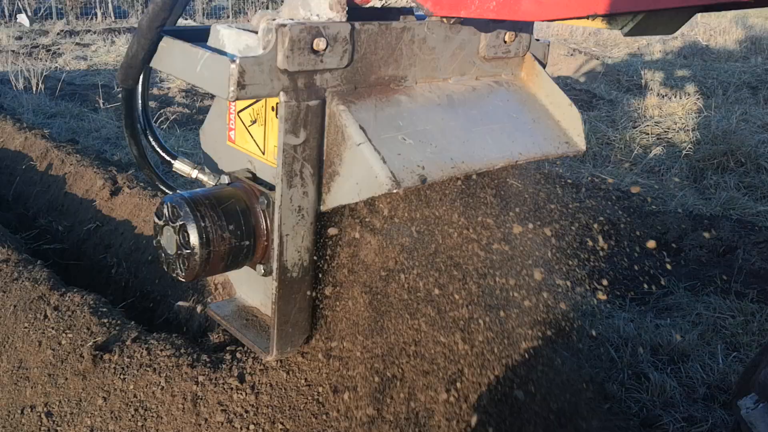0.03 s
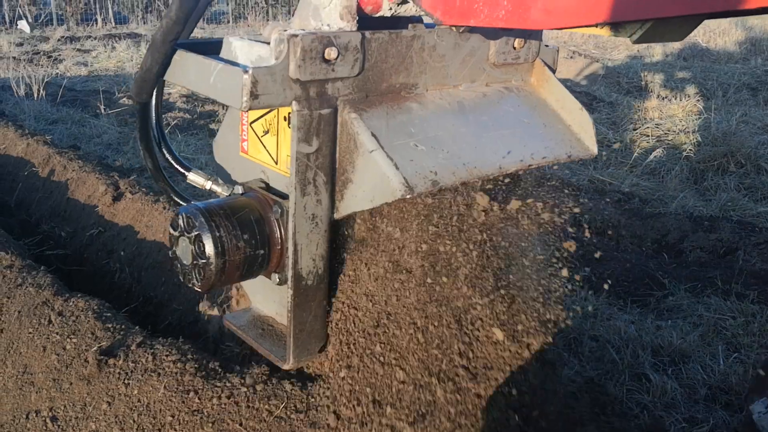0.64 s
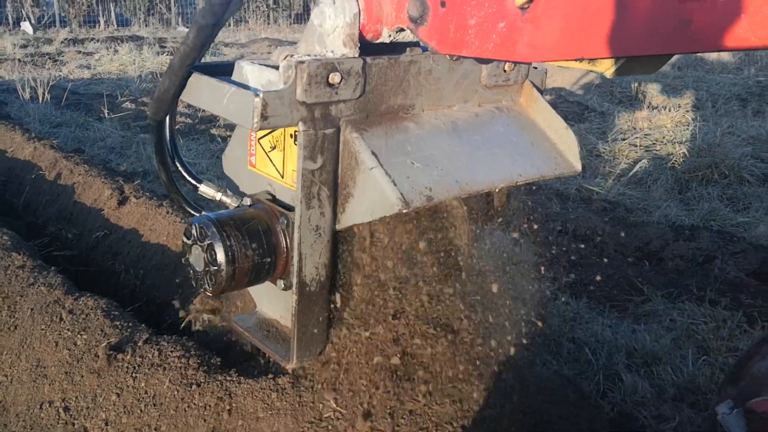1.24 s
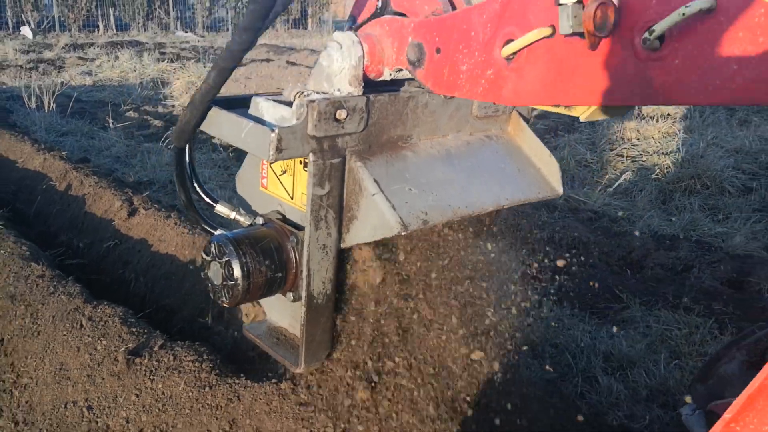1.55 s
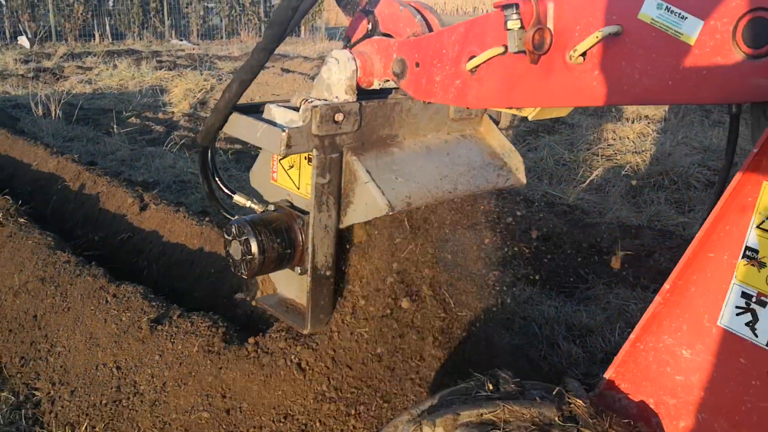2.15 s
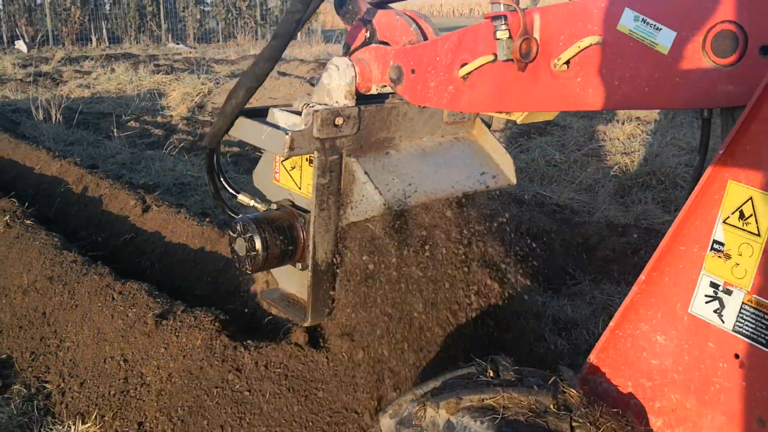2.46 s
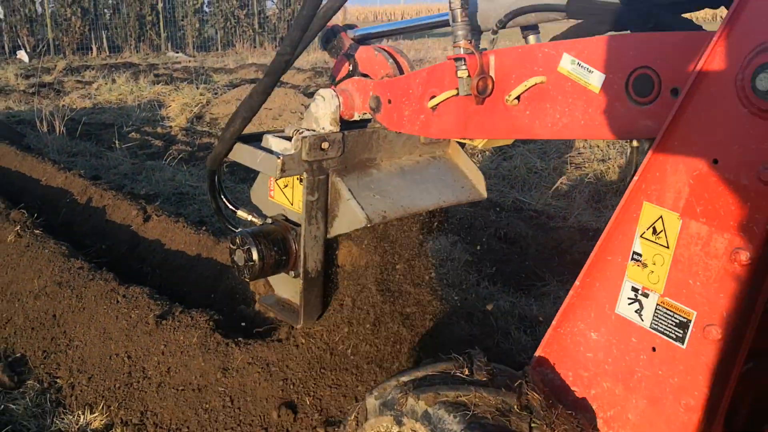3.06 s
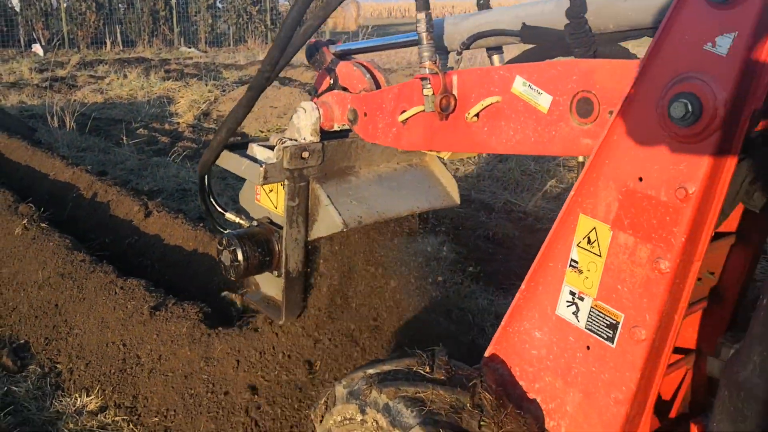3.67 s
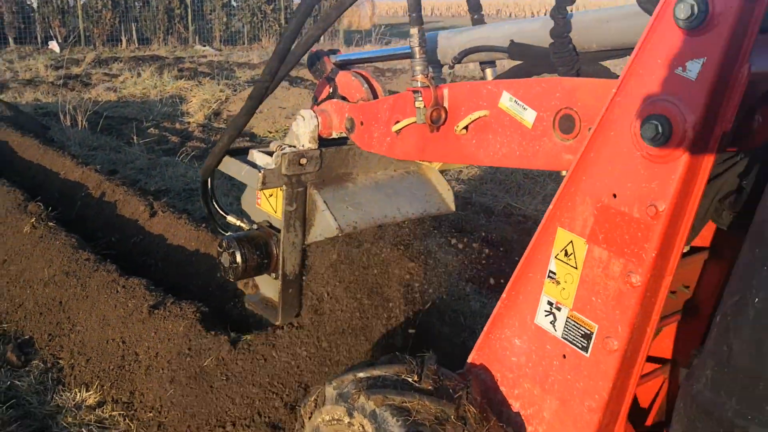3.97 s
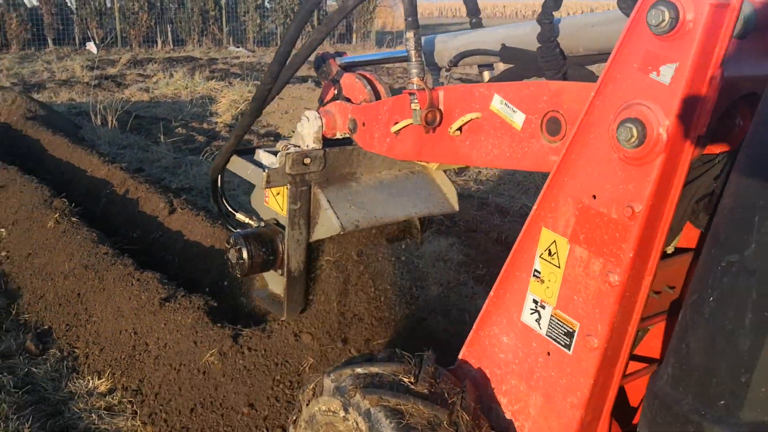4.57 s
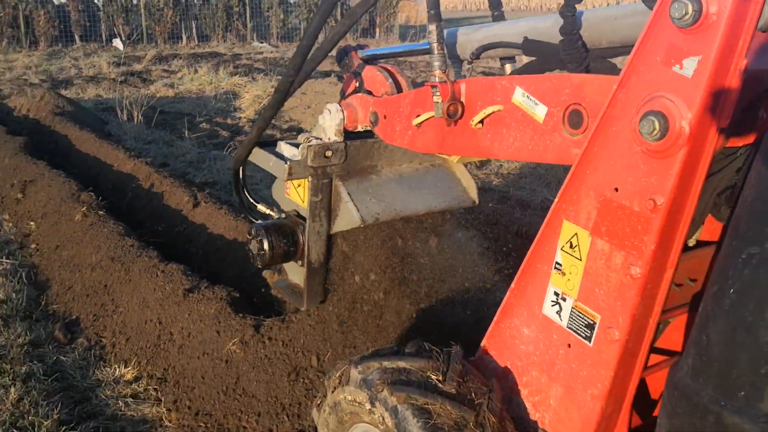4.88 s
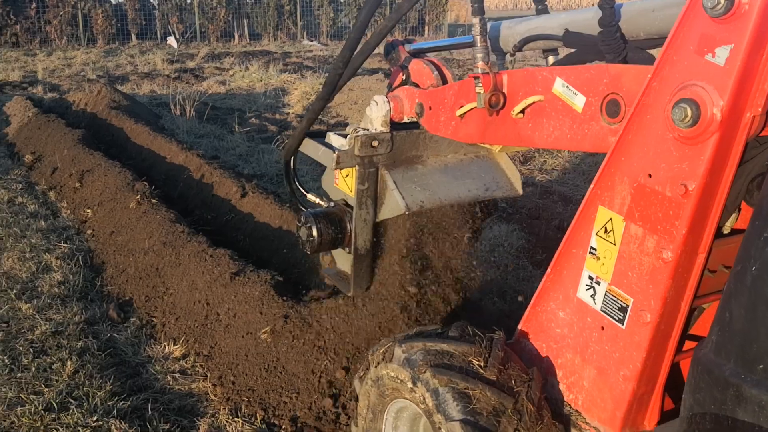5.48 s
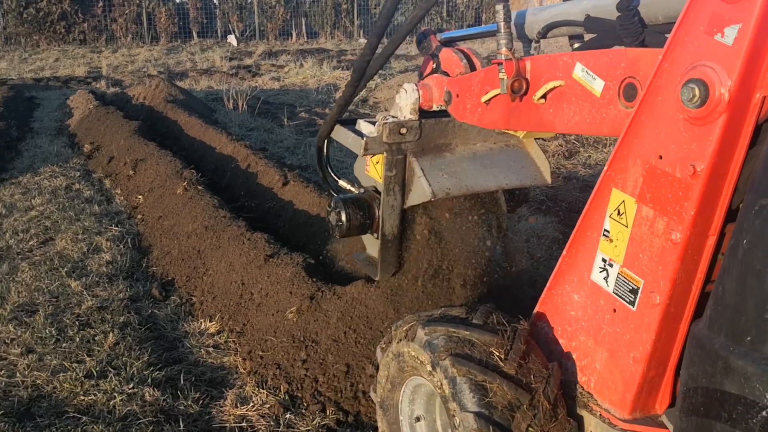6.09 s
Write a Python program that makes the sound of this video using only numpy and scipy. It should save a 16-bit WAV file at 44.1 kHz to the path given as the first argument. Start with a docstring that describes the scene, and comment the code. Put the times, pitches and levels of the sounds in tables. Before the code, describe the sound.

A loud, throbbing engine with a whining fan and pump drives a digging chain that grinds and clinks through stony soil.

```python
"""After a brief silence an engine bursts in at full work: a compact loader digging with a chain trencher.
Its four-stroke V-twin, near 3700 rpm, throbs at the exhaust, knocks in its covers and clatters after
each firing, while the fan hums and fan and pump whine. The chain grinds through soil, links clink and
stones strike; once a lap its drag slows the engine and the governor hunts back. The listener steps from
the boom tip past the arm to the wheel, where the fan's blade tone comes in."""
import sys
import numpy as np
from scipy import signal
from scipy.fft import rfft, irfft, next_fast_len
from scipy.io import wavfile
from scipy.ndimage import map_coordinates

SR = 44100
rng = np.random.default_rng(int(sys.argv[2]) if len(sys.argv) > 2 else 0)


def materialize(psi):
    """Save the field psi as 16-bit PCM at rate SR to the path in sys.argv[1].

    A 1-D psi becomes a single channel; in a 2-D psi each row is a channel.
    """
    bounded = np.clip(np.atleast_2d(psi).T, -1, 1)
    quanta = np.round(bounded * 32767).astype(np.int16)
    wavfile.write(sys.argv[1], SR, quanta)


N = 279153

START_S, TOP_HZ = 0.451, 15200
SET_CYCLE_HZ = 30.673  # four-stroke cycles a second that the governor aims for
SECOND_FIRING = 270 / 720  # share of a cycle between the two cylinders
DRAG_RISE_S, THROTTLE_LAG_S = 0.268, 0.13
# Gain for each Hz of sag: the throttle opens and the firing hardens, while chain and fan slow down.
EXHAUST_DB_PER_HZ, CLATTER_DB_PER_HZ, CHAIN_DB_PER_HZ, BLADE_DB_PER_HZ = 1, 1, -0.3, -5

# The listener's walk. Each row: time in seconds, place (0 boom tip, 1 arm, 2 wheel).
WALK = [(1.62, 0), (1.98, 0.54), (3.1, 1.2), (3.9, 1.45), (4.04, 1.93)]
# Drags of the chain. Each row: peak time in seconds, sag in Hz, settling in seconds, hunting rate in Hz.
DRAGS = [(0.358, 1.554, .439, 1.435), (1.968, 1.319, .288, 1.115), (3.559, 1.202, .405, 0.969),
         (5.252, 1.195, .72, 1.194)]
# Exhaust harmonics 1-11 with a steady fan hum near 370 Hz at the 12th; then the whine of fan and pump.
# Each row: multiple of the cycle rate, relative level in dB at the boom tip, at the arm, at the wheel.
EXHAUST_AND_FAN_HUM = [(1, -36, -36, -38), (2, -24, -22, -24), (3, -24, -25.5, -30.5), (4, -31, -31, -33),
                       (5, -25.5, -23, -22.5), (6, -33, -36, -32), (7, -42, -35, -33),
                       (8, -23, -39.5, -32.5), (9, -26, -42, -39), (10, -32, -41, -45), (11, -32, -43, -37),
                       (12, -33, -33, -34)]
WHINE_HARMONICS = [(24, -32.5, -33, -46), (32, -48, -35, -44), (36, -32, -37, -38), (44, -35, -32.5, -44),
                   (48, -36, -43, -38), (57, -42, -42, -41)]
# Sources as heard from boom tip, arm and wheel in turn. Each row: left gain in dB, right gain in dB.
COVER_GAINS = [(-26.5, -24.5), (-25, -34.5), (-32, -28.5)]
PANEL_GAINS = [(-50, -44), (-28, -45), (-35.5, -57.5)]
CLATTER_GAINS = [(-23, -33.5), (-24, -38.5), (-26, -34.5)]
WHINE_GAINS = [(0, -4.5), (2, -17.5), (2.5, -8)]
GRIND_GAINS = [(-21.5, -23), (-20.5, -28), (-22.5, -23)]
BOOM_GAINS = [(-3.5, -23.5), (-3, -3), (-11, -18)]
# Spectral envelopes of the noisy sources. Each row: frequency in Hz, gain in dB.
RUMBLE_SPECTRUM = [(15, 0), (35, -14), (90, -4), (180, -3), (290, -1.5), (380, -6), (450, -10.5),
                   (600, -14), (1200, -66)]
COVER_SPECTRUM = [(200, -46), (330, -1), (400, 2.5), (520, -0.5), (680, -2.5), (820, 0.5), (1000, -2),
                  (1200, -0.5), (1400, -2), (1700, -31), (3000, -69)]
TICK_SPECTRUM = [(2000, -26), (2800, 2), (3150, 1.5), (3500, 1), (3900, 0), (4300, 2.5), (5300, -1.5),
                 (5900, 0.5), (6300, 1), (6900, 0), (7400, -6.5), (7850, -10), (8300, -41), (10000, -62)]
GRIND_SPECTRUM = [(800, -63), (1250, -13), (1500, -2), (1720, -1), (1900, 0), (2100, -1.5), (2400, -3),
                  (2800, -2.5), (3100, -11.5), (4500, -58)]
STONE_SPECTRUM = [(1800, 1.5), (3500, 3), (7200, 4.0), (8800, -24), (11000, -11.5)]
# The recorder's faint high hiss. Each row: frequency in Hz, gain in dB.
HISS_SPECTRUM = [(8000, -49), (10100, -34), (10600, 2.5), (15000, -3)]
# Modes of the engine's thin tinware. Each row: frequency in Hz, width in Hz, relative level in dB.
TIN_MODES = [(3467, 184, 3), (3930, 83, -2), (4800, 82, -2.5), (5890, 180, -4.5), (7000, 125, -1.5)]
# Modes of the chain's steel. Each row: frequency in Hz, relative level in dB, 60 dB decay in seconds.
STEEL_MODES = [(1716, 1, 0.056), (2240, -9, 0.024), (2720, -14, .04), (3900, -7, .04)]
# Stones striking the steel. Each row: start in seconds, ring gain in dB, crack gain in dB.
STONE_STRIKES = [(0.998, -34, -22), (2.598, -35, -27), (4.349, -31, -33), (5.151, -17.5, -29),
                 (5.589, -29, -29)]
# Rise of the fan's blade tone beside the engine. Each row: time in seconds, relative level in dB.
BLADE_RISE = [(4.2, -63), (4.65, -31.5)]
# Colouring of the clatter at the right ear. Each row: frequency in Hz, gain in dB.
RIGHT_EAR_TREBLE = [(3000, -5), (3700, 7), (4400, -4.5), (5500, -3), (7000, -10.5), (8000, -1)]
# Likeness of the sound at the two ears. Each row: frequency in Hz, coherence from 0 to 1.
EAR_COHERENCE = [(100, 0.86), (300, 1), (420, 0.97), (550, 0.28), (800, 0.09), (1200, 0.18), (1750, 0.16),
                 (2500, 0.072), (3500, 0.79), (5400, 0.64), (7500, 0.096)]
# Later arrival at the right ear. Each row: frequency in Hz, delay in seconds.
EAR_DELAY = [(350, 0.00029), (1200, 0.000564)]


def amp(db):
    """Amplitude grows tenfold for every 20 dB."""
    return 10 ** (np.asarray(db) / 20)


def unit(x):
    """Normalisation brings each channel to rms 1."""
    return x / np.sqrt(np.mean(x ** 2, axis=-1, keepdims=True) + 1e-20)


def along(points, hz):
    """Interpolation of (Hz, value) points on a logarithmic frequency axis."""
    freqs, values = np.transpose(points)
    return np.interp(np.log(hz + 1), np.log(freqs + 1), values)


def timeline(points):
    """Linear interpolation of (seconds, value) points at every sample."""
    return np.interp(np.arange(N) / SR, *np.transpose(points))


def blend(values, place):
    """Linear interpolation between the values at boom tip, arm and wheel."""
    return np.interp(place, np.arange(3), values)


def at_ears(gains, place):
    """A source's gain in dB at each ear depends on where the listener stands."""
    return np.array([blend(ear, place) for ear in np.transpose(gains)])


def wobble(rate):
    """Smooth random modulation: a spline through rate random knots a second."""
    return map_coordinates(rng.standard_normal(int(N * rate / SR) + 4), [np.arange(N) * rate / SR])


def noise():
    """Two uncorrelated white noises."""
    return rng.standard_normal((2, N))


def grains(rate, spread_db):
    """Shot noise: tiny random impacts of uneven size, rate a second."""
    return unit(noise() * (rng.random((2, N)) < rate / SR) * amp(spread_db * rng.uniform(-2.9, 1, (2, N))))


def filtered(x, response):
    """Linear filtering multiplies the spectrum by a frequency response."""
    size = next_fast_len(N + 8192)
    return irfft(rfft(x, size) * response(np.fft.rfftfreq(size, 1 / SR)), size)[..., :N]


def binaural(pair, spectrum):
    """The share of mid to side in two coloured, uncorrelated signals sets the coherence of the ears."""
    def response(hz):
        angle = np.arccos(np.clip(along(EAR_COHERENCE, hz), -1, 1)) / 2
        return amp(along(spectrum, hz)) * np.array([np.cos(angle), np.sin(angle)])
    mid, side = filtered(pair, response)
    return unit(np.array([mid + side, mid - side]))


def ringing(x, modes):
    """Forced resonance: x drives steep-skirted (Hz, width in Hz, dB) modes; the result has rms 1."""
    def response(f):
        return sum(amp(db) * (1j * f * 1.5 * width / (hz * hz - f * f + 1j * f * 0.84 * width)) ** 2
                   for hz, width, db in modes)
    return unit(filtered(x, response))


def governor_sag(lag_s=0):
    """Underdamped feedback: the cycle rate's shortfall in Hz builds with each drag, then swings out."""
    t = np.arange(N) / SR - lag_s
    sag = np.zeros(N)
    for peak_s, depth_hz, settle_s, hunt_hz in DRAGS:
        age = t - peak_s
        envelope = np.exp(-np.where(age < 0, (age / DRAG_RISE_S) ** 2, age / settle_s))
        sag += depth_hz * envelope * np.cos(2 * np.pi * hunt_hz * age)
    return sag


def burst(crank, angle, decay):
    """A periodic envelope rises at one crank angle and decays exponentially; both are in cycles."""
    age = (crank - angle) % 1
    return (1 - np.exp(-age / 0.12)) * np.exp(-age / decay)


def knocks(crank, repeat, size=1024):
    """Partly periodic excitation: the share repeat of its power recurs in every engine cycle."""
    patterns = irfft(np.exp(2j * np.pi * rng.random((2, size // 2 + 1))))
    cyclic = unit(np.array([np.interp(crank % 1, np.arange(size) / size, p) for p in patterns]))
    return np.sqrt(repeat) * cyclic + np.sqrt(1 - repeat) * noise()


def exhaust_and_fan_hum(crank, place, angle=0.361, skew=1.6, scatter=0.11, held_order=6, size=64):
    """Harmonic series: periodic exhaust puffs give multiples 1-11; the fan hums steadily at the 12th."""
    levels = np.array(EXHAUST_AND_FAN_HUM)[:, 1:]
    # The pipe's resonances smear each puff in time; skew deepens the suction after it.
    log_gain = np.log(amp(np.pad(levels, ((1, size - len(levels)), (0, 0)), constant_values=-44)))
    minimum_phase = -signal.hilbert(np.r_[log_gain, log_gain[-2:0:-1]], axis=0).imag[:size]
    phase = skew + np.array([0.55, 0.4, 0.65]) * minimum_phase
    # Echoes off the bodywork scatter the phases of the upper harmonics.
    above_held = np.arange(size) - held_order
    phase += scatter * np.maximum(above_held, 0)[:, None] * rng.standard_normal((size, 1))
    # Beside the wheel a standing wave holds one harmonic back and draws the puffs into a drone.
    phase[:, 2] += np.angle((above_held + 0.24j) ** 2)
    turn = 2 * np.pi * (crank - angle + 0.002 * wobble(14))
    tone = sum(amp(blend(db, place) + 0.56 * wobble(10)) * np.cos(k * turn + blend(phase[k], place))
               for k, db in enumerate(levels, 1))
    throttle_db = EXHAUST_DB_PER_HZ * governor_sag(THROTTLE_LAG_S)
    return np.sqrt(2) * tone * amp(throttle_db + 0.41 * wobble(25))


def gas_rumble(crank, place):
    """Turbulence in the gas leaving the pipe radiates low noise that swells slightly with each puff."""
    puff = unit(2.0 + 0.43 * burst(crank, angle=0.33, decay=0.084))
    return amp(blend([-30, -30.5, -31.5], place)) * puff * binaural(noise(), RUMBLE_SPECTRUM)


def cover_knock(crank, place):
    """Forced vibration: pistons and gears shake the engine covers, and the arm's side panel resonates."""
    throb = unit(1 + 0.53 * burst(crank, angle=0.48, decay=0.42))
    panel = amp(at_ears(PANEL_GAINS, place)) * ringing(throb * noise()[0], [(1000, 200, 0)])
    covers = binaural(throb * knocks(crank, repeat=0.23), COVER_SPECTRUM)
    return amp(at_ears(COVER_GAINS, place) + 2.5) * covers + panel


def clatter_and_hiss(crank, place, sag, angle=0.301):
    """Impact excitation: each firing sprays bright ticks and rings the tinware; recorder hiss follows."""
    first = burst(crank, angle, decay=0.073)
    second = burst(crank, angle + SECOND_FIRING, decay=0.24)
    throb = unit(1 + blend([1.4, 2.1, 0.9], place) * (first + 1.63 * second))
    ticks = knocks(crank, repeat=0.017) + 0.48 * grains(rate=2000, spread_db=-8.0)
    # Mostly the second cylinder shakes the tin, by a new amount each cycle.
    shaking = lambda: unit((0.66 * first + second) * amp(2.3 * wobble(30))) * noise()
    tin = amp(blend([-10, -2.5, -11], place)) * ringing(shaking(), TIN_MODES)
    shield = amp(blend([-8, -16, -12], place)) * ringing(shaking(), [(3830, 150, 0)])
    left, right = binaural(throb * ticks, TICK_SPECTRUM) + tin + shield
    right = unit(filtered(right, lambda hz: amp(along(RIGHT_EAR_TREBLE, hz))))
    level_db = at_ears(CLATTER_GAINS, place) + CLATTER_DB_PER_HZ * sag - 1.14
    return amp(level_db) * (np.array([left, right]) + recorder_hiss(throb, ticks))


def recorder_hiss(throb, ticks):
    """Amplitude modulation: the recorder's faint hiss above 10 kHz pulses with the clatter."""
    return amp([[-28], [-22]]) * np.sqrt(throb) * binaural(ticks, HISS_SPECTRUM)


def fan_and_pump(crank, place):
    """Periodic forcing by fan blades and pump pistons radiates tones locked to the shaft speed."""
    turn = 2 * np.pi * crank
    tones = sum(amp(blend(db, place) + wobble(8)) * np.sin(k * turn + 0.2 * wobble(20))
                for k, *db in WHINE_HARMONICS)
    return np.sqrt(2) * tones * amp(at_ears(WHINE_GAINS, place))


def chain_grind(place, sag):
    """Friction of teeth in gritty soil makes noise and drives resonances of the boom and its guard."""
    grit = lambda: noise() + 0.7 * grains(rate=700, spread_db=11.5)
    boom = amp(at_ears(BOOM_GAINS, place) + 1.8 * wobble(15)) * ringing(grit()[0], [(1660, 355, 0)])
    guard = amp(blend([-5, -18, -11], place)) * ringing(grit()[0], [(2070, 350, 0)]) * amp([[-3], [2]])
    level_db = at_ears(GRIND_GAINS, place) + CHAIN_DB_PER_HZ * sag - 2.0 + 0.22 * wobble(18)
    return amp(level_db) * (binaural(grit(), GRIND_SPECTRUM) + boom + guard)


def clink(t, vary_db):
    """Free vibration: struck steel rings in damped modes, varying in strength and pitch at each blow."""
    ring = np.zeros(len(t))
    for hz, db, t60 in STEEL_MODES:
        envelope = amp(db + vary_db * rng.normal() - 60 * t / t60)
        ring += envelope * np.sin(2 * np.pi * hz * (1 + 0.0083 * rng.normal()) * t)
    return ring * (1 - np.exp(-t / 0.0022))  # soil cushions the attack


def chain_links(place, link_hz=6.2):
    """A nearly periodic train of impacts: each link rings as it drops onto the sprocket."""
    t = np.arange(SR // 8) / SR
    links = np.zeros(N + SR)
    for due_s in np.arange(START_S, N / SR, 1 / link_hz):
        onset = int((due_s + 0.015 * rng.normal()) * SR)
        links[onset:onset + len(t)] += clink(t, vary_db=4.5)
    return links[:N] * amp(blend([-31, -28, -33], place)) * amp([[2], [-4]])


def stone_strikes():
    """A hard impact has a broad spectrum: each stone gives a short crack and leaves the steel ringing."""
    t = np.arange(SR // 8) / SR
    stones = np.zeros(N + SR)
    for start_s, ring_db, crack_db in STONE_STRIKES:
        crack = amp(crack_db - 60 * t / 0.014) * rng.standard_normal(len(t))
        stones[int(start_s * SR):][:len(t)] += amp(ring_db) * clink(t, vary_db=5.0) + crack
    return filtered(stones, lambda hz: amp(along(STONE_SPECTRUM, hz)))


def blade_tone(crank, sag, order=44):
    """Turbulence modulates the fan's blade-passing tone in amplitude and phase, making it rough."""
    level_db = timeline(BLADE_RISE) + BLADE_DB_PER_HZ * sag + 2.8 * wobble(30)
    phase = 2 * np.pi * order * crank + 0.65 * wobble(70)
    return np.sqrt(2) * amp(level_db) * np.sin(phase) * amp([[5], [-8]])


def scene():
    """Superposition: engine parts on one crank angle add to the chain and reach the left ear first."""
    sag = governor_sag()
    crank = np.cumsum(SET_CYCLE_HZ - sag) / SR  # in four-stroke cycles
    place = timeline(WALK)
    mix = exhaust_and_fan_hum(crank, place) + gas_rumble(crank, place)
    mix += cover_knock(crank, place) + clatter_and_hiss(crank, place, sag)
    mix += fan_and_pump(crank, place) + blade_tone(crank, sag)
    left, right = mix + chain_grind(place, sag) + chain_links(place) + stone_strikes()
    right = filtered(right, lambda hz: np.exp(-2j * np.pi * hz * along(EAR_DELAY, hz)))
    return np.array([left, right])


def record(dry, surge_db=7.0):
    """Gating and band limiting: an abrupt opening with a brief surge, and nothing above TOP_HZ."""
    age = np.maximum(np.arange(N) / SR - START_S, 0)
    opening = np.minimum(age / 0.0026, 1) * amp(surge_db * np.exp(-age / 0.0098))
    return filtered(dry * opening, lambda hz: hz < TOP_HZ)


dry = scene()
out = record(dry)
materialize(out)
```